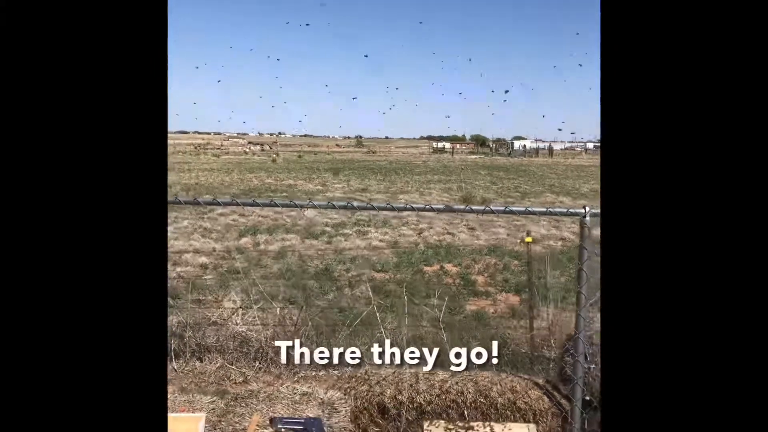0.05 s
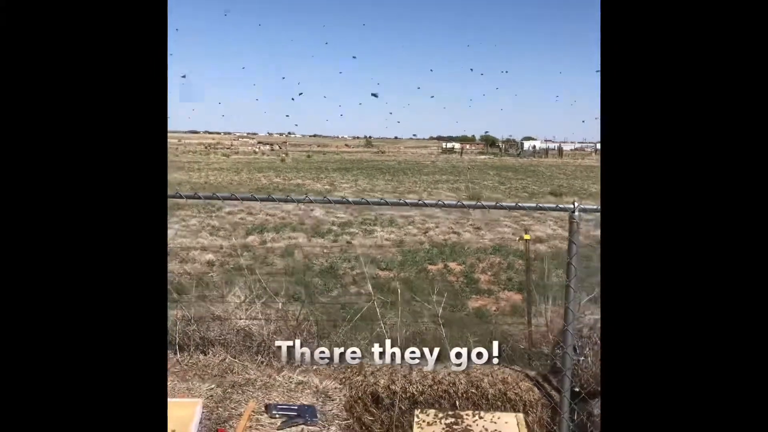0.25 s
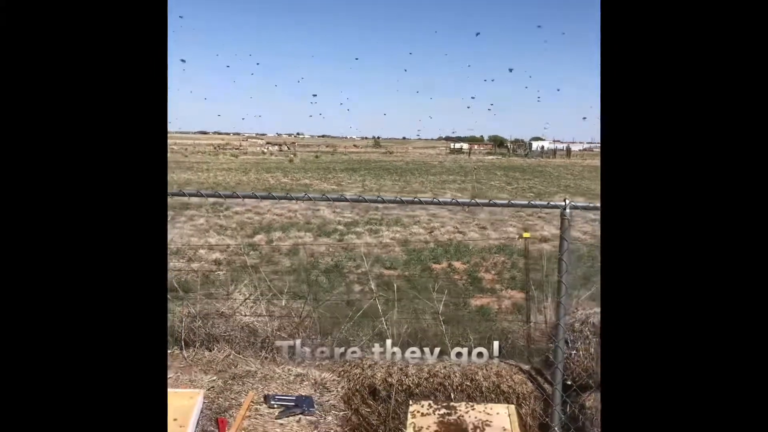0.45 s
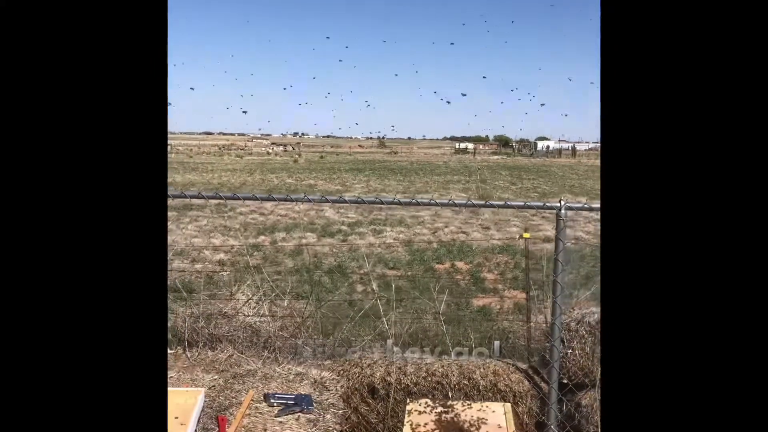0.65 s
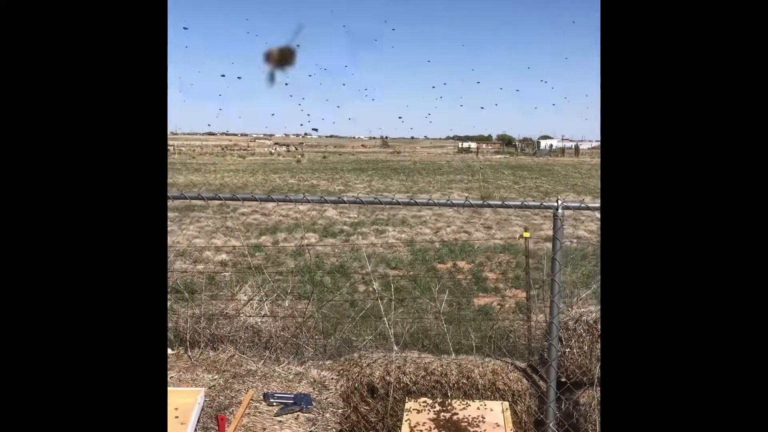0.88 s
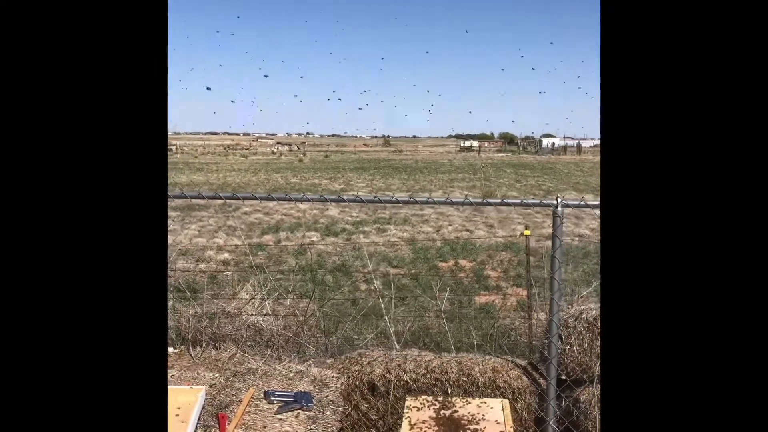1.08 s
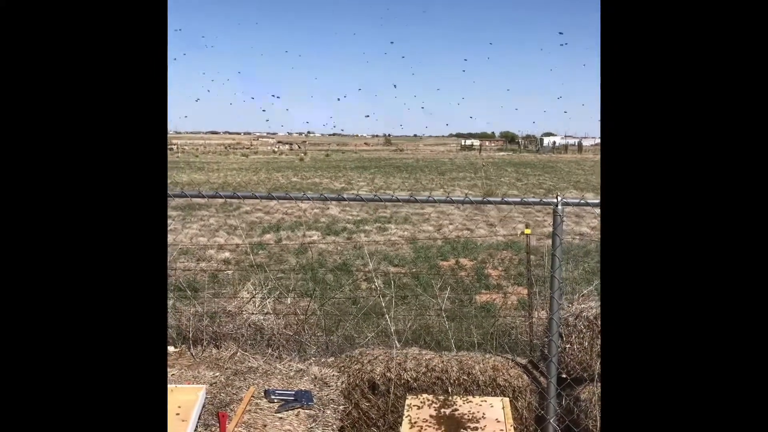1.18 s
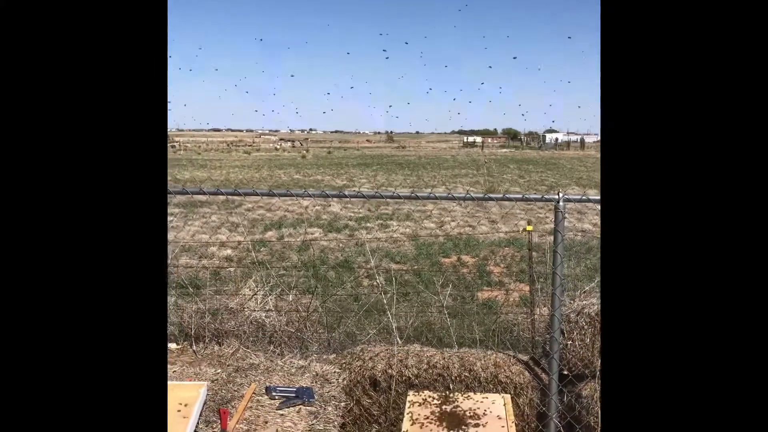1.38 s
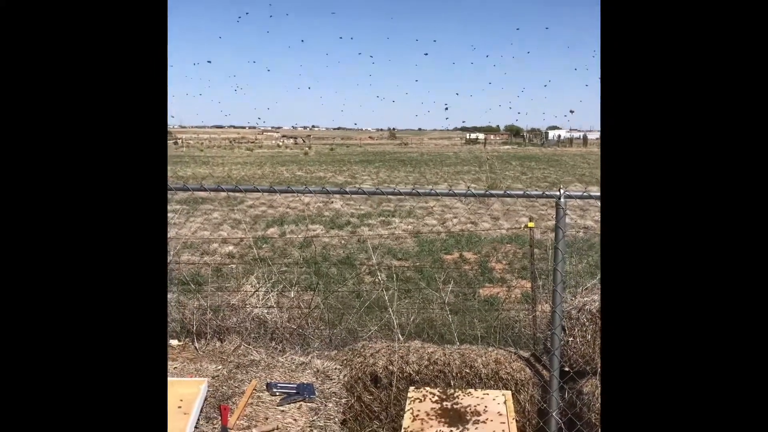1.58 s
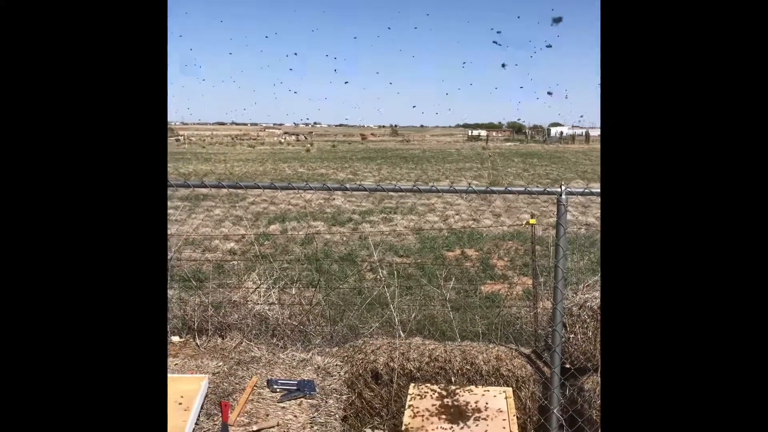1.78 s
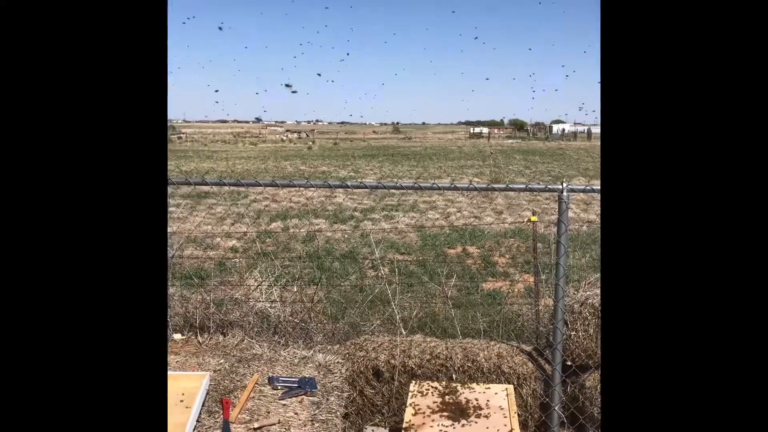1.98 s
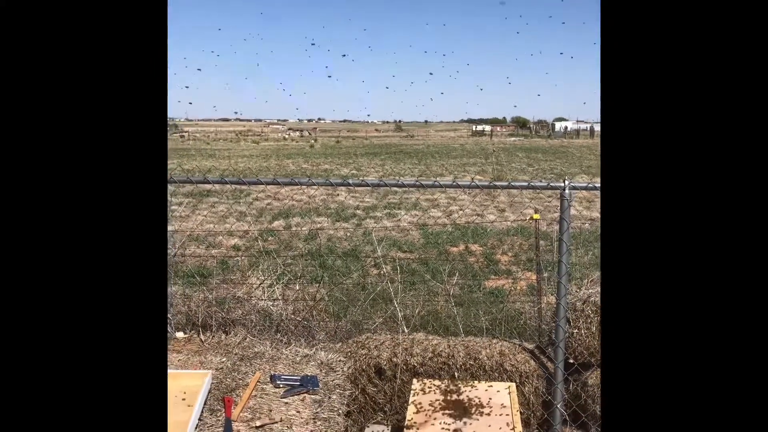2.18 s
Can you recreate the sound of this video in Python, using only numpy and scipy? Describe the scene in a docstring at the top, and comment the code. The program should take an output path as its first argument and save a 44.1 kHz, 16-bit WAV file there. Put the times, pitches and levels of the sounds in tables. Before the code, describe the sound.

A swarm of bees hums steadily over an open field, single bees buzzing close past and dropping in pitch. Wind gusts rumble and thump on the microphone throughout, with a soft hiss of dry grass and two small early ticks.

```python
"""From the start, the wingbeats of a swarm of honey bees merge into a hum, and dry grass hisses in the breeze.
Right away one bee flies close and something ticks nearby; more bees pass, each sinking in pitch.
At 0.25 s a strong gust rumbles and thumps on the microphone, and a fainter tick follows at 0.65 s.
Gusts keep coming, with the hardest thump and a soft rush of air near 1.4 s.
After 2 s the gusts are gone, leaving the bees and the breeze."""
import sys
import numpy as np
from scipy import signal
from scipy.fft import rfft, irfft
from scipy.io import wavfile
from scipy.ndimage import uniform_filter1d

SR = 44100
rng = np.random.default_rng(int(sys.argv[2]) if len(sys.argv) > 2 else 0)


def log_audio(samples):
    """Write samples as a 16-bit WAV file to the path given in sys.argv[1]."""
    # one column per channel
    frames = np.atleast_2d(samples).T
    # limit to full scale, then quantise
    limited = np.clip(frames, -1, 1)
    pcm = np.round(limited * 32767).astype(np.int16)
    wavfile.write(sys.argv[1], SR, pcm)


N = 99225

# How strong a bee's overtones are, from low to high: (frequency [Hz], level [dB])
BUZZ_SPECTRUM = [(240, 0), (490, 2.5), (740, -5), (1000, -4), (1250, -6), (1550, -9), (1900, -13.5),
                 (2500, -13.5), (3300, -24.5), (5000, -34)]
def bee(beat_hz, glide=0, boosted=0, boost_db=10, count=20, size=2048):
    """One bee buzzes by repeating a wing stroke at a slightly unsteady rate."""
    harmonics = np.arange(1, count + 1)   # whole multiples of the wingbeat
    gains = gain_at(BUZZ_SPECTRUM, harmonics * beat_hz) * from_db(boost_db * (harmonics == boosted))
    phases = np.exp(2j * np.pi * rng.random(count))
    stroke = rms_one(irfft(np.r_[0, gains * phases], size))
    flutter = 0.00886 * drift(rate_hz=39.9)
    strokes_done = np.cumsum(beat_hz * (1 + glide + flutter)) / SR
    return np.interp(strokes_done % 1 * size, np.arange(size + 1), np.r_[stroke, stroke[0]])


def swarm(count=30, wingbeat_hz=238, spread=.07, level_db=-51.5):
    """Many bees, each with its own wingbeat, blend into one hum."""
    hum = np.zeros(N)
    for hz in wingbeat_hz * np.exp(spread * np.sqrt(3) * np.linspace(-1, 1, count)):
        steering = .035 * drift(rate_hz=5)   # the pitch bends as the bee steers
        buzz = bee(hz, steering)
        nearness_db = 2 * drift(rate_hz=3.8)   # louder when it drifts nearer
        hum += buzz * from_db(nearness_db)
    return from_db(level_db) * rms_one(hum)


# Bees flying close: (time when nearest [s], time to fade by half [s], wingbeat [Hz], level [dB],
# harmonic aimed at the microphone [number])
BEE_PASSES = [(0.034, 0.052, 255.6, -44.5, 1), (0.126, 0.041, 253.4, -50, 2), (0.206, 0.044, 250.8, -52, 1),
              (0.479, 0.061, 253.6, -51, 2), (.69, .05, 230, -51.5, 2), (0.845, 0.06, 232.6, -54.5, 2),
              (0.973, 0.054, 238, -58, 2), (1.087, 0.015, 240.5, -55, 1), (1.148, 0.02, 255.2, -50, 2),
              (1.262, 0.038, 259, -51, 3), (1.359, 0.066, 254.8, -52.5, 3), (1.543, 0.034, 247, -54, 2),
              (1.702, 0.068, 247.3, -55, 2), (1.867, 0.1, 230.5, -56, 2), (2.054, 0.032, 232, -62, 2),
              (2.097, .05, 243.6, -58.5, 1), (2.216, 0.033, 250, -55, 2)]
def close_bees(doppler=.024):
    """A passing bee swells and fades while its pitch sinks (the Doppler effect)."""
    out = np.zeros(N)
    for nearest, half, hz, db, harmonic in BEE_PASSES:
        along_path = (seconds() - nearest) / half
        distance = np.hypot(1, along_path)   # 1 at the nearest point
        glide = -doppler * along_path / distance
        out += from_db(db) / distance ** 2 * bee(hz, glide, boosted=harmonic)
    return out


# The deep tone of wind on the microphone: (frequency [Hz], level [dB per Hz])
RUMBLE_SPECTRUM = [(20, -28), (32, -12), (48, 0.5), (78, 3), (115, -3.5), (170, -10.5), (260, -29.5),
                   (420, -38), (1000, -58), (3000, -98)]
def rumble(centre_hz, window_s=0.018, size=16384):
    """Churning air around one pitch, held steady so that the gust alone shapes its loudness."""
    churn = noise(RUMBLE_SPECTRUM, size, shift=centre_hz / 85)   # the table is centred on 85 Hz
    power = uniform_filter1d(np.abs(signal.hilbert(churn)) ** 2, int(window_s * SR), mode="wrap")
    return np.resize(rms_one(churn / np.sqrt(power + 1e-9)), N)


# Gusts hitting the microphone: (start [s], length [s], level [dB], centre pitch [Hz])
WIND_GUSTS = [(0, 0.024, -39, 95), (0.067, 0.055, -45.5, 113), (0.172, 0.079, -42, 84),
              (0.247, 0.047, -23.5, 112.6), (0.324, 0.021, -30.5, 131), (0.362, 0.029, -28.5, 82.4),
              (.449, 0.0063, -30, 92), (0.493, 0.068, -41, 81.5), (0.613, 0.047, -32.5, 86),
              (0.714, 0.06, -30.5, 96), (.785, 0.029, -54, 80), (0.884, 0.031, -39, 97),
              (0.945, 0.07, -32.5, 81.6), (1.043, 0.061, -36.5, 96), (1.168, 0.032, -38.5, 85),
              (1.212, 0.048, -29.5, 85), (1.318, 0.036, -32.5, 79.5), (1.398, 0.037, -25, 91.7),
              (1.428, 0.045, -26.5, 57.4), (1.545, 0.061, -37.5, 91), (1.643, 0.013, -29, 92),
              (1.673, 0.047, -35, 79), (1.751, 0.02, -29, 82.5), (1.816, 0.037, -30.5, 83),
              (1.966, 0.02, -32.5, 82), (1.997, 0.017, -40, 76)]
def wind(breeze_db=-51, rise_s=0.01, fall_s=0.0097):
    """Each gust rises, holds and dies away over a faint steady rumble."""
    t = seconds()
    out = from_db(breeze_db) * noise(RUMBLE_SPECTRUM)
    for start, length, db, hz in WIND_GUSTS:
        before = np.maximum(start - t, 0)
        after = np.maximum(t - start - length, 0)
        out += from_db(db) * np.exp(-before / rise_s - after / fall_s) * rumble(hz)
    return out


# Swirls of air hitting the microphone, except the first row (0.052 s), which is the knock of the nearby tick:
# (time [s], peak level [dB], centre pitch [Hz], ringing [Q])
WIND_THUMPS = [(0.052, -28, 250, 0.4), (0.246, -18, 106.5, 0.94), (0.275, -21, 196, 0.5),
               (0.381, -20.5, 107, 0.51), (.45, -35.5, 107, 2.3), (0.742, -23.5, 239, 1.42),
               (1.0, -23, 217.5, 2.13), (1.216, -22.5, 162, 1.5), (1.265, -31, 222, 0.35),
               (1.386, -22, 202, 0.37), (1.414, -13.5, 131, 0.69), (1.64, -31, 184, 1.4)]
def thumps(top_ratio=1.51):
    """A swirl of air, or the knock of the nearby tick, gives one round push that dies quickly; a higher Q rings
    longer."""
    out = np.zeros(N)
    for start, db, hz, q in WIND_THUMPS:
        push = np.full(N, 1e-18)
        push[int(start * SR)] = 1
        ring = signal.iirpeak(hz, q, fs=SR)
        ringing = signal.lfilter(*ring, signal.lfilter(*ring, push))
        thump = signal.sosfilt(signal.butter(2, hz * top_ratio, fs=SR, output="sos"), ringing)
        out += from_db(db) * thump / np.abs(thump).max()
    return out


# The tone of open air and dry grass: (frequency [Hz], level [dB per Hz])
GRASS_SPECTRUM = [(20, -35), (50, 6), (110, 6.5), (200, 12.5), (340, 5.5), (620, 3), (850, 8), (1300, 6.5),
                  (1900, -5.5), (3200, -5.5), (4500, -5), (7000, -7.5), (9000, -7.5), (12500, -10),
                  (15500, -8.5)]
# How loud the hiss is as time goes by: (time [s], level [dB])
GRASS_LOUDNESS = [(0, -49.5), (.35, -50.5), (.65, -50.8), (.9, -50), (1.3, -52.1), (1.7, -51),
                  (2.25, -51.5)]
# The tone of a soft, mid-pitched rush: (frequency [Hz], level [dB per Hz])
RUSH_SPECTRUM = [(400, -6), (650, -9), (800, -2), (950, -13), (1300, -22), (2500, -40)]
def grass(rush_at_s=1.44, rush_half_s=0.33, rush_db=-52):
    """The breeze hisses in dry grass, easing slowly, while one soft rush swells and fades."""
    t = seconds()
    hiss_gain = from_db(np.interp(t, *np.transpose(GRASS_LOUDNESS)))
    rush_gain = from_db(rush_db) / (1 + ((t - rush_at_s) / rush_half_s) ** 2)
    return hiss_gain * noise(GRASS_SPECTRUM) + rush_gain * noise(RUSH_SPECTRUM)


# Small dry ticks: (time [s], level before filtering [dB], fade time [s], treble limit [Hz])
DRY_TICKS = [(.049, -33.5, .0005, 12000), (.646, -45, .007, 1100)]
def ticks(knock_hz=800, knock_db=9):
    """Each nearby tick is a tiny burst of noise with a dull knock under it."""
    clicks = np.zeros(N)
    for start, db, fade, top_hz in DRY_TICKS:
        age = seconds() - start
        burst = (age >= 0) * np.exp(-np.abs(age) / fade) * rng.standard_normal(N)
        clicks += from_db(db) * signal.lfilter(*signal.butter(2, top_hz, fs=SR), burst + 1e-18)
    knocks = signal.lfilter(*signal.butter(2, knock_hz, fs=SR), clicks)
    return clicks + from_db(knock_db) * knocks


def from_db(db):
    """Turn decibels into a number to multiply by."""
    return 10 ** (np.asarray(db) / 20)


def rms_one(x):
    """Scale a signal so that its average strength (rms) is 1."""
    return x / np.sqrt(np.mean(x ** 2) + 1e-20)


def seconds():
    """The time of every sample."""
    return np.arange(N) / SR


def gain_at(spectrum, hz):
    """Look up how strong a frequency is in a spectrum table."""
    freqs, db = np.transpose(spectrum)
    return from_db(np.interp(np.log(np.maximum(hz, 1)), np.log(freqs), db))


def noise(spectrum, size=N, shift=1):
    """Steady noise with the tone of a spectrum table; shift multiplies its pitch."""
    hz = np.arange(size // 2 + 1) * SR / size
    white = rfft(rng.standard_normal(size))
    return rms_one(irfft(white * gain_at(spectrum, hz / shift), size))


def drift(rate_hz):
    """Smooth random wandering, about 1 in size; a higher rate wanders faster."""
    pole = np.exp(-200 * np.pi * rate_hz / SR)
    jitter = rng.standard_normal(N // 100 + 1002)   # one value per 100 samples, plus time to settle
    slow = signal.lfilter([1], [1, -2 * pole, pole * pole], jitter)[1000:]
    return np.interp(np.arange(N) / 100, np.arange(len(slow)), rms_one(slow))


def scene():
    """Bees, grass, wind and ticks add up at one microphone."""
    return (swarm() + close_bees() + grass() + wind() + thumps() + ticks())[None]


def record(dry, low_cut_hz=41.3, high_cut_hz=15800):
    """The deepest bass is turned down and the highest treble is cut off sharply."""
    thinned = signal.sosfilt(signal.butter(4, low_cut_hz, "high", fs=SR, output="sos"), dry)
    return signal.sosfilt(signal.ellip(12, .1, 80, high_cut_hz, fs=SR, output="sos"), thinned)


dry = scene()
out = record(dry)
log_audio(out)
```